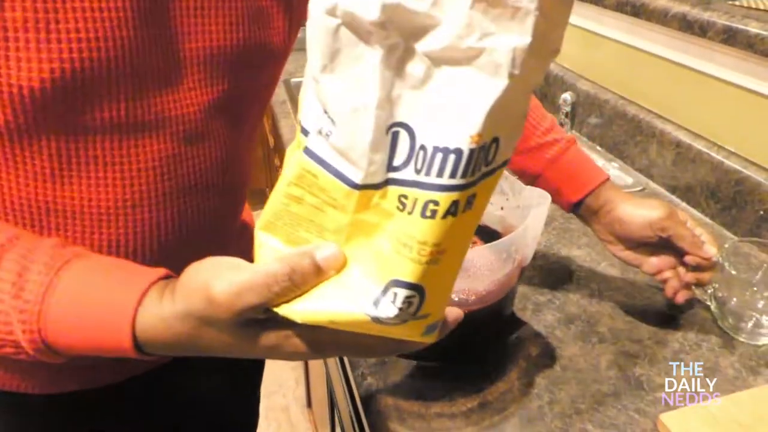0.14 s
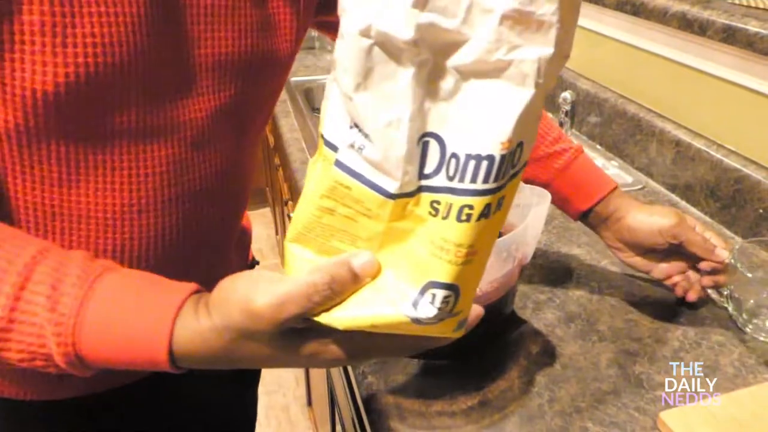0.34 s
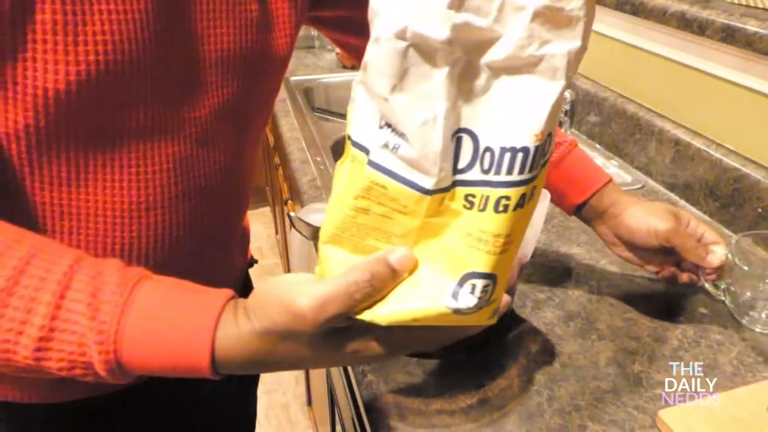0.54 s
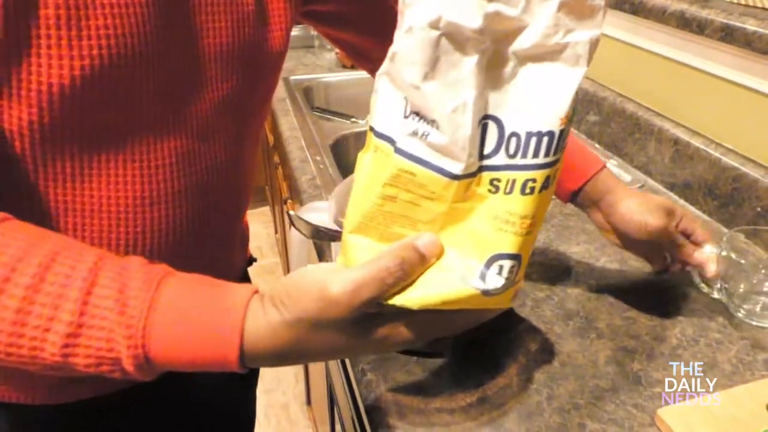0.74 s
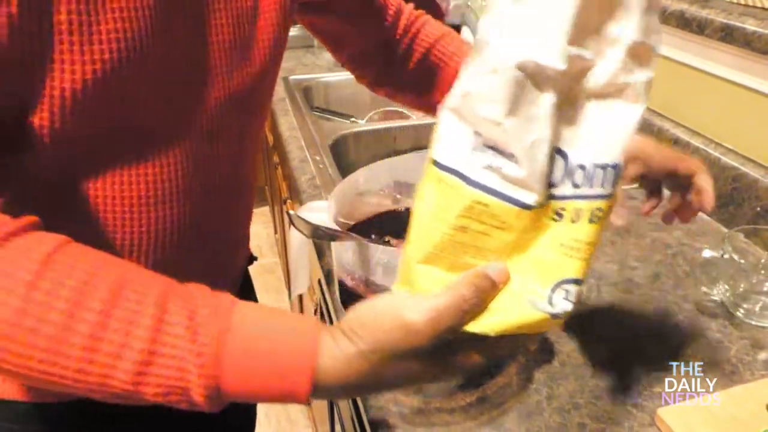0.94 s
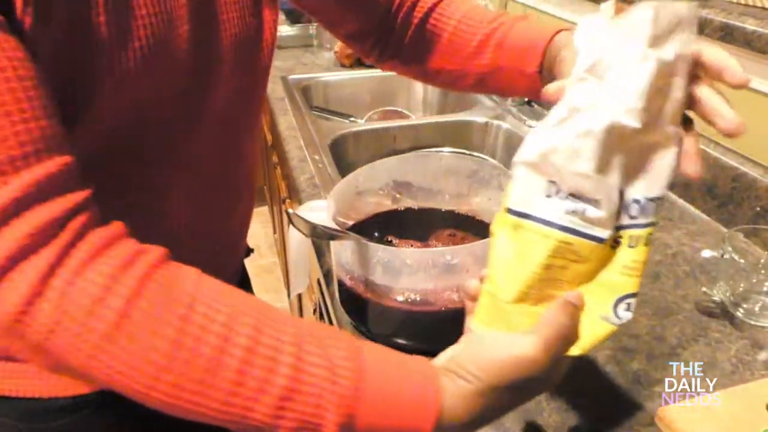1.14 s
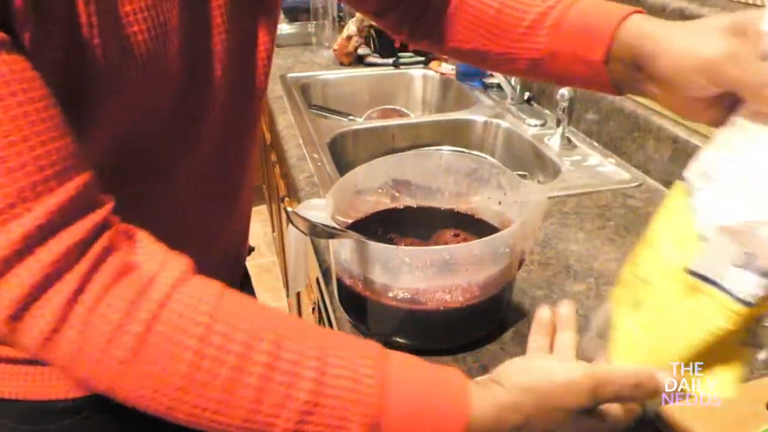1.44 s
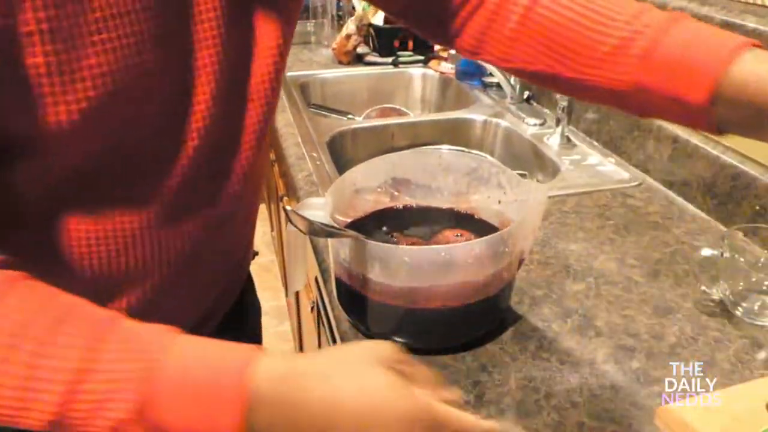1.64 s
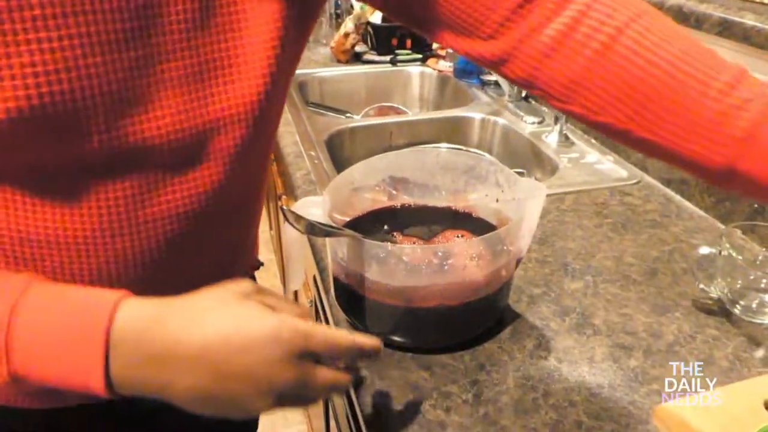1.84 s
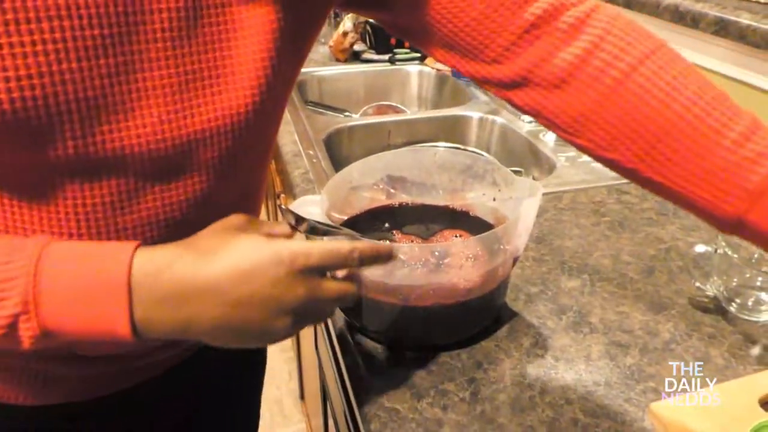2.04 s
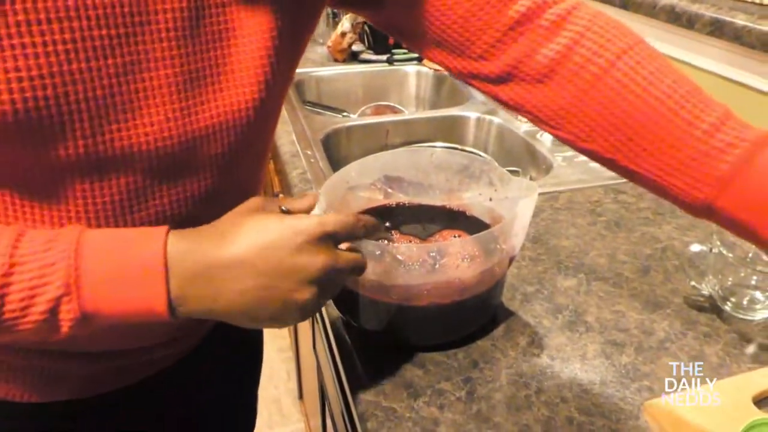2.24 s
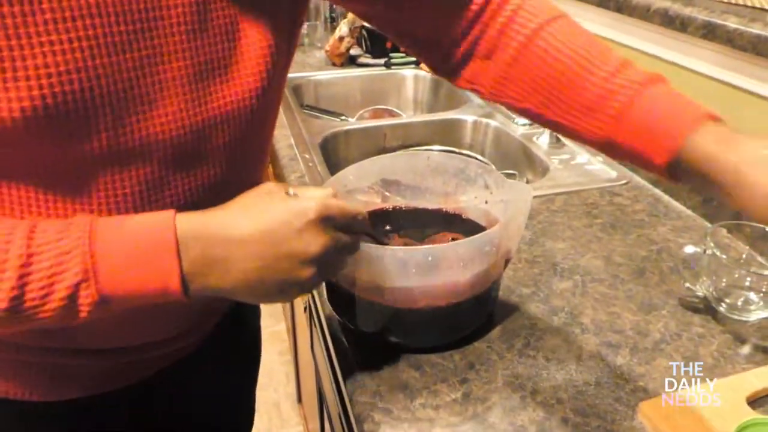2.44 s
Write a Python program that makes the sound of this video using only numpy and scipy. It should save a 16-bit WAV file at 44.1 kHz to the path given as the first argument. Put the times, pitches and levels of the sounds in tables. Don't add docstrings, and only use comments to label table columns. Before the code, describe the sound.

A wooden drawer knocks hard, slides roughly and bumps shut in a cluster, contents rattling; then a stiff paper bag crinkles in short bursts. Small hard kitchen, close nearly mono microphone, faint fridge hum.

```python
import sys
import numpy as np
from scipy import signal
from scipy.fft import rfft, irfft, next_fast_len
from scipy.io import wavfile
from scipy.ndimage import map_coordinates

SR = 44100
rng = np.random.default_rng(int(sys.argv[2]) if len(sys.argv) > 2 else 0)


def digitize_waveform(pressure):
    field = np.atleast_2d(pressure).T
    bounded = np.clip(field, -1, 1)
    quanta = np.round(bounded * 32767).astype(np.int16)
    wavfile.write(sys.argv[1], SR, quanta)


def linear_from_db(decibels):
    return 10 ** (np.asarray(decibels, float) / 20)


N = 114660

# f/Hz, level/dB
SHEET_SPECTRUM = [(880, -6.5), (1500, -22), (1790, 7.5), (2150, 2.5), (2490, 2), (3090, 2.5), (3580, 5.5),
                  (6430, 3), (15500, -25)]
# f/Hz, level/dB
FIBRE_HISS = [(6000, -1.5), (8500, 6.5), (13000, -4), (15300, -14), (16500, -31)]


def unit(x):
    return x / np.sqrt(np.mean(x ** 2) + 1e-20)


def along(points, hz):
    f, v = np.transpose(points)
    return np.interp(np.log(hz + 1), np.log(f + 1), v)


def curves(rows):
    s, *cols = np.transpose(rows)
    return [np.interp(np.arange(N) / SR, s, c, left=-120, right=-120) for c in cols]


def filtered(x, response):
    m = next_fast_len(x.shape[-1] + 8192)
    spectrum = rfft(x, m) * response(np.fft.rfftfreq(m, 1 / SR))
    return irfft(spectrum, m)[..., :x.shape[-1]]


def coloured(x, spectrum):
    return unit(filtered(x, lambda hz: linear_from_db(along(spectrum, hz))))


def peak(hz, width):
    return lambda f: 1j * f * width / (hz * hz - f * f + 1j * f * width)


def wobble(rate):
    values = rng.standard_normal(int(N * rate / SR) + 4)
    return map_coordinates(values, [np.arange(N) * rate / SR])


def grains(per_s, spread_db):
    size = linear_from_db(spread_db * np.minimum(rng.exponential(size=N), np.e))
    hits = (rng.random(N) < per_s / SR) * size
    puff = linear_from_db(-60 * np.arange(256) / SR / 0.0063)
    return unit(np.convolve(hits, puff)[:N] + 7.0) * rng.standard_normal(N)


def add(track, s, sound):
    part = track[round(s * SR):][:len(sound)]
    part += sound[:len(part)]


def room(x):
    # f/Hz, T60/s
    decay_time = [(120, 0.22), (300, 0.22), (1000, 0.45), (3000, 0.34), (8000, 0.26)]
    # f/Hz, level/dB
    tail_colour = [(100, 10.5), (250, 1), (1000, 4), (1750, -2), (2100, -4), (3000, -6), (8000, -6)]
    hz, t, z = signal.stft(rng.standard_normal(SR // 2), SR, nperseg=256)
    level_db = along(tail_colour, hz)[:, None] - 60 * t / along(decay_time, hz)[:, None]
    tail = signal.istft(z * linear_from_db(level_db), SR, nperseg=256)[1]
    tail = tail * np.clip(np.arange(len(tail)) / SR / 0.0034, 0, 1) ** 2
    return signal.fftconvolve(x, tail / np.linalg.norm(tail))


def knocks():
    # t/s, panel level/dB, panel f/Hz, crack level/dB, room answer level/dB
    blows = [(0.197, -59, 377, -37, -43), (0.2446, 5.5, 391, -1.5, -17.5), (.270, -6, 500, -23, -11),
             (.460, -18, 380, -46, -12), (0.4766, -8, 340, -19.5, -14), (0.748, -31, 300, -33.5, -7),
             (0.7753, -4, 398, -19, -17), (.815, -37, 400, -42, -4), (0.8554, -12.5, 374, -28, -13.5),
             (0.906, -15.5, 380, -36, -13.5), (0.9522, -4, 365, -6.5, -16), (.973, -17, 414, -49, -5.5),
             (.984, -11, 449, -24.5, -16), (1.0, -15, 500, -22.5, -11)]
    # f/Hz, level/dB
    crack_spectrum = [(400, -4.5), (800, -2), (1400, -8.5), (3400, -15.5), (6600, -27), (8500, -57),
                      (12000, -72)]
    # f/Hz, level/dB, T60/s
    wood_modes = [(137, 2, 0.077), (248.2, -4.5, 0.33), (340, 6.5, 0.075), (563.5, -4.5, 0.14),
                  (1027, -2, 0.057)]
    push_cycles, push_lead, push_t60 = 1.926, 0.95, 0.05
    crack_t60, crack_room_db, low_cut_hz = 0.015, -7.5, 95
    out, t = np.zeros(N), np.arange(SR // 2) / SR
    rise = np.sin(np.pi / 2 * np.clip(t / 0.0005, 0, 1)) ** 2
    for s, db, hz, crack_db, room_db in blows:
        softness = 0.5 - min(db, 0) / 25
        window = np.abs(np.sin(np.pi * np.clip(t * hz / push_cycles, 0, 1))) ** softness
        push = -np.sin(2 * np.pi * hz * t + push_lead) * window * linear_from_db(-20 * t / push_t60)
        crack = coloured(rng.standard_normal(len(t)), crack_spectrum) * linear_from_db(-60 * t / crack_t60) * rise
        ring = np.zeros(len(t))
        for f, level, t60 in wood_modes:
            decay = linear_from_db(level + rng.normal(0, 1.05) - 60 * t / t60)
            ring += decay * np.sin(2 * np.pi * f * t + rng.uniform(0, 3.5))
        blow = linear_from_db(db) * push + linear_from_db(crack_db) * crack
        add(out, s, blow + linear_from_db(db + room_db) * ring * np.clip(t / 0.0096, 0, 1))
        sent = (blow + linear_from_db(crack_db + crack_room_db) * crack)[:2048]
        add(out, s, linear_from_db(room_db + 5) * room(sent))
    return filtered(out, lambda f: (1j * f / (low_cut_hz + 1j * f)) ** 2)


def rattle():
    starts = [
        .246,
        .4765,
        .978,
        .9525,
        .9525,
    ]
    # f/Hz, bandwidth/Hz, level/dB, T60/s
    contents = [(780, 410, -15, 0.5), (1803, 100, -41.5, 0.64), (1652, 200, -29.5, 0.39),
                (1530, 250, -12.5, 0.049), (1020, 600, -24, 0.45)]
    out, t = np.zeros(N), np.arange(SR // 2) / SR
    for s, (hz, width, db, t60) in zip(starts, contents):
        shake = unit(filtered(rng.standard_normal(len(t)), lambda f: peak(hz, width)(f) ** 2))
        tone = np.sin(2 * np.pi * hz * t) * 2 * (width < hz / 20)
        shake = (shake + tone) / 2
        add(out, s, shake * linear_from_db(db - 60 * t / t60) * np.clip(t / 0.0032, 0, 1))
    return out


def slide():
    # t/s, speed level/dB
    travel = [
        (.24, -119),
        (.26, -27),
        (.42, -38),
        (.45, -44),
        (.58, -45.5),
        (.63, -34.5),
        (.71, -34.5),
        (.735, -45.5),
        (.95, -48),
    ]
    # f/Hz, level/dB
    runner_spectrum = [(88, -60), (150, -31), (236, -8.5), (405, -3), (454, -2.5), (495, -8.5), (1500, -30),
                       (1950, -58), (3300, -120)]
    # f/Hz, level/dB
    scrape_spectrum = [(700, -6.5), (1200, 0.5), (3000, -4), (6500, -10.5), (7500, -34)]
    roll_per_s, scrape_db = 220, -7
    speed_db, = curves(travel)
    turns = np.cumsum(roll_per_s * linear_from_db(0.76 * wobble(29.83)) / SR)
    bumps = (1.7 + np.cos(np.pi * turns) ** 4) * rng.standard_normal(N)
    rolling = linear_from_db(speed_db) * coloured(bumps, runner_spectrum)
    scrape = linear_from_db(0.56 * speed_db - 23.0 + scrape_db) * coloured(grains(850, 1), scrape_spectrum)
    return rolling + scrape


def burst(response, t60):
    t = np.arange(2048) / SR
    noise = unit(filtered(rng.standard_normal(len(t)), response))
    x = noise * linear_from_db(-60 * t / t60) * np.clip(t / 0.0003, 0, 1)
    return x / np.abs(x).max()


def snaps():
    # t/s, hollow f/Hz, hollow level/dB, sheet f/Hz, sheet level/dB
    creases = [(1.193, 820, -35, 1940, -39), (1.243, 308, -27.5, 2570, -34),
               (1.246, 1010, -23.5, 1770, -32.5), (1.250, 595, -22, 2730, -27),
               (1.26, 1190, -34, 4530, -29.5), (1.3, 1030, -29, 5160, -28), (1.31, 880, -26, 2980, -28),
               (1.371, 1100, -20, 3700, -20), (1.387, 1500, -23, 4800, -19), (1.404, 1740, -21, 4320, -12),
               (1.4058, 577, -15, 2890, -11.5), (1.436, 1210, -22.5, 6130, -12),
               (1.437, 2000, -30, 3600, -18.5), (1.448, 774, -43, 4000, -27),
               (1.562, 783, -28, 1870, -35.5), (1.639, 668, -48, 2150, -40),
               (1.658, 2100, -28.5, 4040, -38.5), (1.69, 2000, -55, 4500, -39),
               (1.7377, 510, -36, 1510, -34), (1.762, 1800, -40, 5200, -37.5), (1.91, 1600, -28, 2800, -33),
               (1.918, 340, -25, 1500, -26.5), (1.922, 710, -28, 2400, -29), (1.926, 506, -30.5, 1200, -48),
               (1.935, 1200, -22, 3210, -33), (1.9408, 1800, -19.5, 2800, -15.5),
               (1.9458, 880, -17.5, 4040, -15), (1.949, 860, -25.5, 6700, -16.5),
               (1.954, 790, -28.5, 2500, -24), (1.967, 990, -41, 3000, -27),
               (2.096, 2300, -38, 4400, -34.5), (2.118, 343, -36, 4130, -32),
               (2.1218, 3480, -20.5, 5700, -20), (2.125, 630, -31.5, 4600, -11.5),
               (2.1298, 3520, -25, 6240, -14.5), (2.1523, 3930, -35, 5260, -18.5),
               (2.16, 714, -35, 5200, -27), (2.168, 1500, -36, 3000, -34), (2.35, 1960, -52, 9000, -37.5)]
    body_t60, body_q, sheet_t60, sheet_q = 0.031, 2.14, 0.011, 3.2
    wide_db, strike_db, tick_db, top_hz = -10.5, -1.5, -16.5, 8600
    room_db, body_room_db = -10, -6
    out = np.zeros(N)
    for s, body_hz, body_db, sheet_hz, sheet_db in creases:
        def hollow(f):
            return peak(body_hz, body_hz / body_q)(f) ** 2

        def stiff(f):
            resonance = peak(sheet_hz, sheet_hz / sheet_q)(f) ** 2
            return (resonance + linear_from_db(wide_db + along(SHEET_SPECTRUM, f))) / (1 + (f / top_hz) ** 4)

        def click(f):
            return peak(sheet_hz, sheet_hz)(f) ** 2 / (1 + 1j * f / top_hz) ** 2

        body = linear_from_db(body_db + 1.5) * burst(hollow, body_t60)
        sheet = burst(stiff, sheet_t60)
        strike = filtered(np.arange(2048) == 0, click)
        strike = linear_from_db(strike_db) * strike / np.abs(strike).max()
        tick = linear_from_db(tick_db) * burst(lambda f: linear_from_db(along(FIBRE_HISS, f)), sheet_t60 / 2)
        sheet = linear_from_db(sheet_db + 3.5) * (sheet + strike + tick)
        add(out, s, body + sheet)
        add(out, s, linear_from_db(room_db) * room(linear_from_db(body_room_db) * body + sheet))
    return out


def rustle():
    # t/s, effort level/dB, dull part level/dB, fine hiss level/dB
    handling = [(1.17, -74, 18, 9), (1.195, -42, 4.5, -4.5), (1.30, -42, -1, -8), (1.355, -44, -1, -4.5),
                (1.44, -36.5, -17, -21), (1.53, -47, 3, -54), (1.62, -59, -5, -15), (1.635, -50, -0.5, -13),
                (1.71, -49, 1, -13), (1.725, -61, 16, -10), (1.76, -55, -2, -5), (1.895, -43.5, -7.5, -2.5),
                (1.945, -35.5, -3, -15), (2.04, -47.5, -3, -17), (2.085, -57, 2, -6),
                (2.105, -37.5, -8.5, -5.5), (2.17, -41.5, 6.5, -9.5), (2.25, -49, -3, -17),
                (2.28, -46.5, -1, -14), (2.32, -66.5, 8.5, -6)]
    # f/Hz, level/dB
    bulk_spectrum = [(60, -40), (130, -28), (200, 2), (869, 5.5), (1540, 3.5), (1670, -2), (2320, -1),
                     (2500, 0), (3250, -3.5), (5500, -120)]
    effort_db, dull_db, fine_db = curves(handling)
    crinkles = grains(1500, -1.5)
    sheet = linear_from_db(2.4 * wobble(40.12)) * coloured(crinkles, SHEET_SPECTRUM)
    bulk = linear_from_db(dull_db + 4.77 * wobble(35.28)) * coloured(grains(300, 2.5), bulk_spectrum)
    fine = linear_from_db(fine_db + wobble(29.0)) * coloured(rng.standard_normal(N), FIBRE_HISS)
    return linear_from_db(effort_db) * (sheet + bulk + fine)


def rings():
    # t/s, f/Hz, level/dB, T60/s
    spots = [(.2445, 764, -16.5, 0.026), (.9528, 1031, -17.5, 0.07), (.9528, 1565, -15.5, 0.046),
             (0.2444, 187, -8, 0.035), (1.012, 249, -23.5, 0.21), (.982, 1617, -27, .3),
             (1.188, 89, -36, 0.073), (1.248, 112, -41, 0.09), (1.407, 395, -20.5, 0.051),
             (1.2815, 1170, -20, .012), (1.3703, 840, -14.5, 0.032), (1.3872, 770, -15, 0.023),
             (1.3872, 3470, -17, 0.014), (1.4042, 829, -11, 0.027), (1.4042, 5160, -6, 0.016),
             (1.4355, 3414, -19, 0.023), (1.9418, 934, -7, 0.016), (1.942, 1730, -23.5, 0.071),
             (2.1248, 2680, -4.5, 0.009), (2.1735, 1450, -19.5, 0.028)]
    rise_s, room_db = 0.00059, -17.5
    out, t = np.zeros(N), np.arange(8192) / SR
    for s, hz, db, t60 in spots:
        tone = linear_from_db(db - 60 * t / t60) * np.sin(2 * np.pi * hz * t) * np.clip(t / rise_s, 0, 1)
        add(out, s, tone)
        add(out, s, linear_from_db(room_db) * room(tone))
    return out


def draughts():
    # t/s, level/dB, half length/s
    gusts = [
        (0.064, -52, 0.055),
        (0.804, -50, .1),
        (1.0, -50, 0.09),
        (1.516, -47, 0.093),
        (1.927, -39, .04),
        (2.14, -52.5, 0.045),
        (2.3, -63, 0.036),
    ]
    # f/Hz, level/dB
    rumble_spectrum = [(12, -21), (25, 12), (45, -12), (90, -39), (200, -67)]
    t = np.arange(N) / SR
    swell = sum(linear_from_db(db) * np.exp(-((t - s) / half) ** 2) for s, db, half in gusts)
    return swell * coloured(rng.standard_normal(N), rumble_spectrum)


def air():
    # f/Hz, level/dB
    noise_spectrum = [(12, -46), (20, -2), (39, -14.5), (58, -23), (216, -21.5), (248, -10.5), (499, -23),
                      (4670, -38.5), (16000, -41)]
    # f/Hz, bandwidth/Hz
    cabinet = [(250, 3.9), (345, 4.4), (455, 88)]
    noise_db, hum_db = -50.5, -61
    hum = sum(unit(filtered(rng.standard_normal(N), peak(hz, width))) for hz, width in cabinet)
    noise = coloured(rng.standard_normal(N), noise_spectrum)
    return linear_from_db(noise_db + 1.2 * wobble(8.1)) * noise + linear_from_db(hum_db + 0.28 * wobble(5.1)) * hum


def scene():
    # f/Hz, level/dB
    side_level = [(40, -28), (150, -38), (300, -53), (700, -40), (2400, -27), (6000, -26), (12000, -20.5)]
    # f/Hz, level/dB
    side_hiss = [(30, -4), (200, -2.5), (2000, -8.5), (15000, -13.5), (16000, -41)]
    drawer = knocks() + rattle() + slide()
    bag = snaps() + rustle()
    mid = drawer + bag + rings() + draughts() + air()
    side = filtered(mid, lambda hz: 1j * linear_from_db(along(side_level, hz)))
    side = side + linear_from_db(-68) * coloured(rng.standard_normal(N), side_hiss)
    low = filtered(side, lambda hz: 1 / (1 + (hz / 1500) ** 2))
    side = side + low * (np.clip(3 * wobble(16) + 1, 0, 2) - 1)
    return np.array([mid + side, mid - side])


def roll_off(x):
    return signal.sosfilt(signal.butter(12, 16650, fs=SR, output="sos"), x)


def record(dry):
    notch_hz, notch_width_hz, top_hz = 5870, 64.6, 15900
    duck_from_db, duck_share, duck_s = -19.5, 0.87, 0.052
    x = filtered(dry, lambda f: 1 - peak(notch_hz, notch_width_hz)(f))
    pace = 1 / (duck_s * SR)
    power = signal.lfilter([pace], [1, pace - 1], np.mean(x ** 2, axis=0))
    excess_db = np.maximum(10 * np.log10(power + 1e-12) - duck_from_db, 0)
    x = x * linear_from_db(-duck_share * excess_db)
    clipped = x / (1 + np.abs(x) ** 16) ** (1 / 16)
    mix = filtered(clipped, lambda f: linear_from_db(-30 * np.clip((f - top_hz) / 400, 0, 1) - 120 * (f > 16650)))
    return roll_off(mix)


dry = scene()
out = record(dry)
digitize_waveform(out)
```